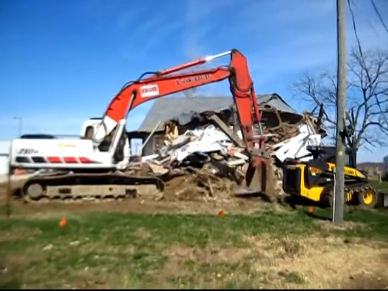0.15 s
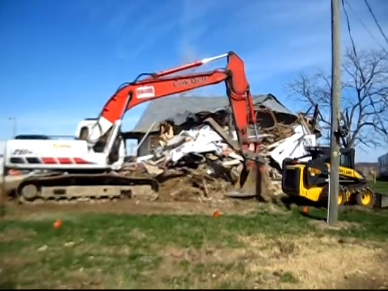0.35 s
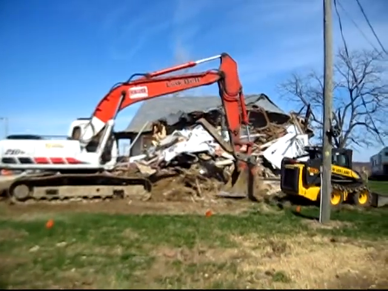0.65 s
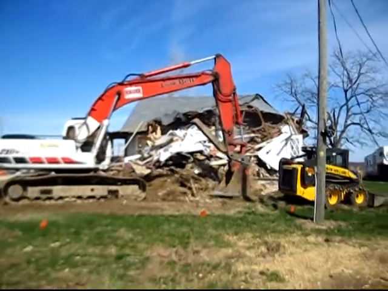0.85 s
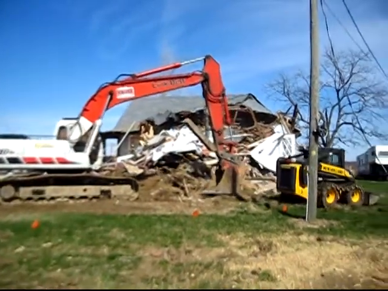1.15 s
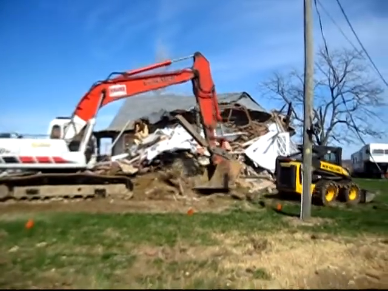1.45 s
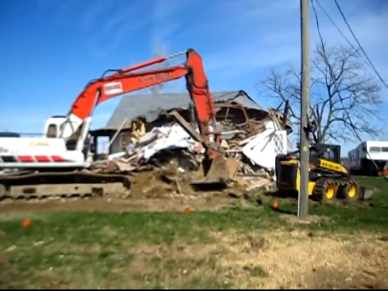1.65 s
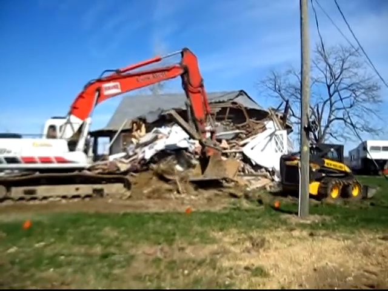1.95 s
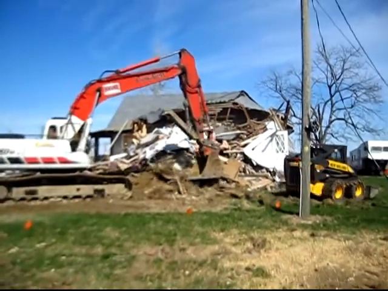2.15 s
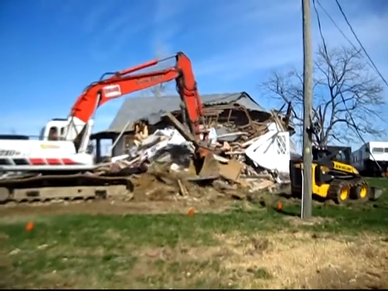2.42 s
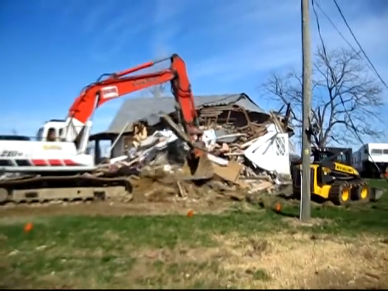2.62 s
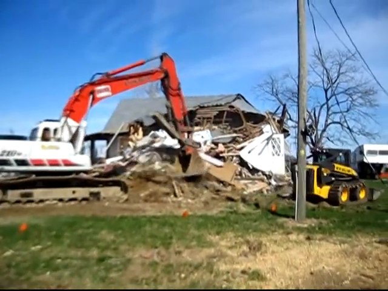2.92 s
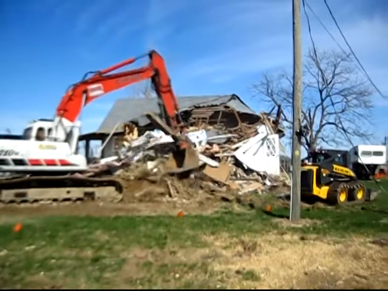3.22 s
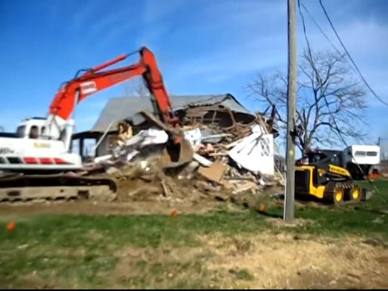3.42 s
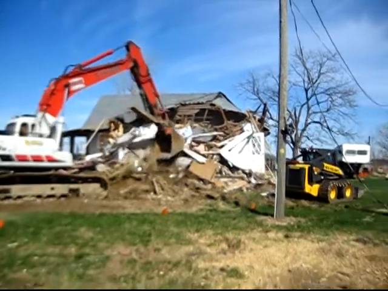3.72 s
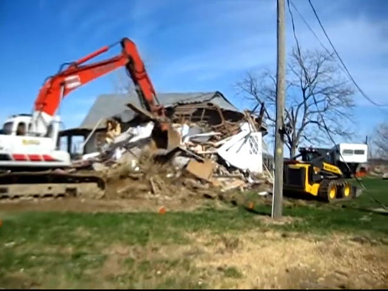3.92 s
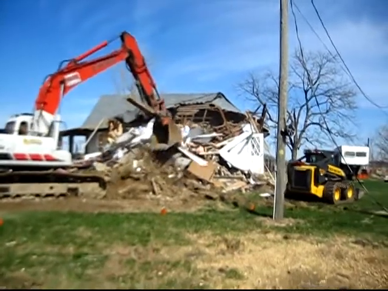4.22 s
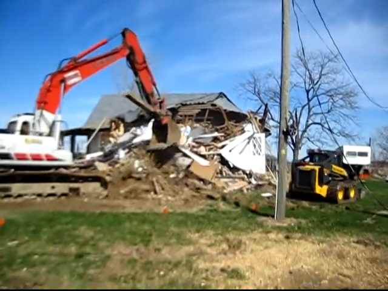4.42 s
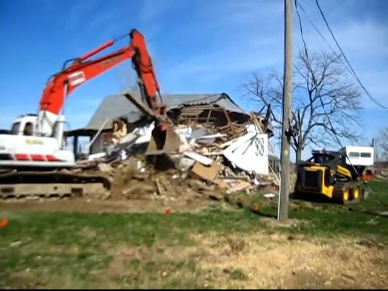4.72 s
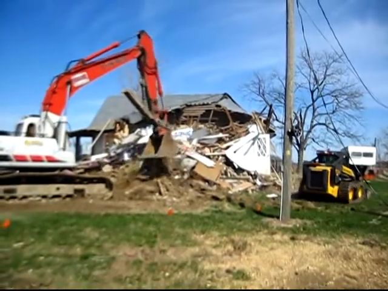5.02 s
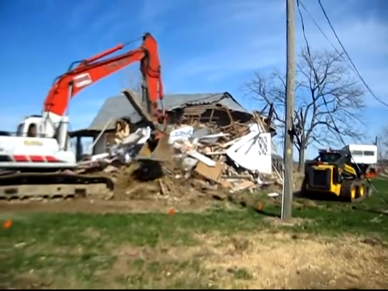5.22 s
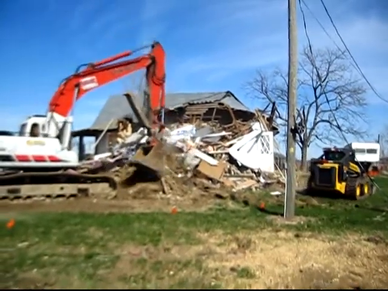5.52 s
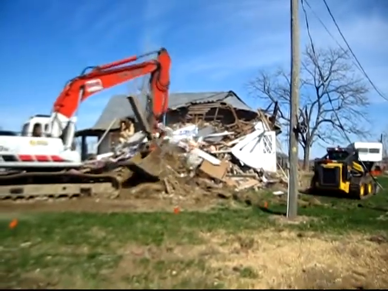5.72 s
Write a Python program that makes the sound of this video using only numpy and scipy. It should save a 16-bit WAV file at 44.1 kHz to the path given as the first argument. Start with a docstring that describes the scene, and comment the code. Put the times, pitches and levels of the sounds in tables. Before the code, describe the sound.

Low wind thuds and a rough engine drone open the scene. Hollow bucket knocks and tearing wood follow, then a dense run of cracks and debris slides until about 3.6 seconds. Afterwards mostly engine, trickling rubble and renewed wind bumps, with sparse snaps. Outdoors, machine at a distance, cheap microphone with harsh, limited treble.

```python
"""Excavator in a wooden wreck

A diesel excavator drags its bucket through a wrecked wooden house, heard across a lawn on a gusty day.
The engine drones: uneven knocks and a fan roar, coloured by its casing. Wind presses on the small microphone.
Random clicks make pouring rubble, bursts of fibre snaps make cracking boards, and sharp cycles make clean breaks.
Timbers ring the bucket, and steel joints squeak as near sines.
The microphone's slow converter mirrors the treble."""
import sys
import numpy as np
from scipy import signal
from scipy.fft import rfft, irfft, next_fast_len
from scipy.io import wavfile

SR = 44100
rng = np.random.default_rng(int(sys.argv[2]) if len(sys.argv) > 2 else 0)


def transcribe(signal):
    """Save signal, clipped to [-1, 1], as a 16-bit WAV file at the path in sys.argv[1]."""
    frames = np.atleast_2d(signal).T
    limited = np.clip(frames, -1, 1)
    pcm = np.round(limited * 32767).astype(np.int16)
    wavfile.write(sys.argv[1], SR, pcm)


N = 258867   # length of the sound in samples


def from_db(db):
    """Turns decibels into gain."""
    return 10 ** (np.asarray(db) / 20)


def rms_one(x):
    """Scales a signal to an rms (average strength) of 1."""
    return x / np.sqrt(np.mean(x ** 2) + 1e-20)


def in_time(rows):
    """Joins the points of a table into one curve per column, over all samples."""
    times, *columns = np.transpose(rows)
    return [np.interp(np.arange(N) / SR, times, column) for column in columns]


def filtered(x, response):
    """Applies a table of (frequency [Hz], gain [dB]) to a signal."""
    hz, db = np.transpose(response)
    size = next_fast_len(N + 4096)
    bins_hz = np.maximum(np.arange(size // 2 + 1) * SR / size, 1)
    gain = from_db(np.interp(np.log(bins_hz), np.log(hz), db))
    return irfft(rfft(x, size) * gain, size)[..., :N]


def coloured(x, spectrum):
    """Shapes a flat signal by a spectrum and scales it to rms 1."""
    return rms_one(filtered(x, spectrum))


def lowpass(x, hz, order):
    """Dulls a signal by weakening what lies above a frequency."""
    return signal.sosfilt(signal.butter(order, hz, fs=SR, output="sos"), x)


def drift(rate_hz):
    """Wanders at random around 0 with a spread of 1; a higher rate wanders faster."""
    step = 40   # samples between the computed points
    r = np.exp(-2 * step * np.pi * rate_hz / SR)
    noise = rng.standard_normal(N // step + 2002)
    slow = signal.lfilter([1], [1, -2 * r, r * r], noise)[2000:]   # skip the start-up of the filter
    return np.interp(np.arange(N) / step, np.arange(len(slow)), rms_one(slow))


def grains(per_s, spread_db):
    """Scatters random clicks of uneven size, all positive."""
    sizes = from_db(spread_db * np.minimum(rng.exponential(1, N), 4))
    return sizes * (rng.random(N) < per_s / SR)


def resonance(x, hz, width_hz):
    """Rings at one frequency, with gain 1 at the peak; a narrow width rings longer."""
    r = np.exp(-np.pi * width_hz / SR)
    top = np.array([1, 0, -1]) * (1 - r * r) / 2
    return signal.lfilter(top, [1, -2 * r * np.cos(2 * np.pi * hz / SR), r * r], x)


def wind():
    """Eddies press on the membrane mostly one way: skewed pulses in clumps over smooth turbulence."""
    # Gusts: (time [s], level [dB], small eddies against large [dB])
    gusts = [(0.0, -37, -5), (0.01, -23, 3), (0.21, -16.5, -2.5), (0.24, -28.5, -4), (0.33, -13, -2),
             (0.55, -18.5, -3.5), (0.57, -23, -2), (0.62, -22.5, 0.5), (0.69, -22, -1), (0.72, -24, 2),
             (0.82, -15, -3), (0.87, -18.5, -11), (1.14, -20, -1), (1.18, -9.5, -6), (1.19, -20.5, -14),
             (1.24, -15, 11.5), (1.26, -19, -7), (1.37, -19, -9), (1.45, -21.5, -8), (1.5, -18, -4.5),
             (1.57, -28, -23), (1.65, -15, -10), (1.68, -26, -15), (1.81, -27, -15), (1.86, -21.5, -6),
             (1.96, -23.5, -2), (2.09, -25, 4.5), (2.12, -14.5, -1.5), (2.2, -20, -1), (2.29, -22.5, 0.5),
             (2.4, -32.5, 7.5), (2.53, -22.5, -5), (2.66, -24.5, -2), (2.71, -19.5, 0.5), (2.76, -35.5, 2),
             (2.83, -40, 4), (2.88, -22.5, -6), (2.94, -28.5, -3), (3.06, -27.5, -3), (3.07, -32, -6),
             (3.32, -44.5, -1), (3.56, -28.5, 6.5), (3.6, -30.5, -2), (3.84, -30.5, 4), (3.92, -17.5, -1),
             (3.96, -29, 7.5), (4.32, -19, 4), (4.36, -24.5, -3), (4.4, -20.5, 1), (4.63, -20.5, -7.5),
             (4.67, -36, 9), (4.71, -21, 2), (4.76, -37, 6), (4.79, -21.5, -7), (4.97, -26.5, 9),
             (5.0, -24, 1), (5.02, -25, 5), (5.2, -20.5, 1.5), (5.21, -21.5, 2), (5.28, -19, -1),
             (5.71, -23, -12), (5.82, -23.5, 1.5), (5.87, -22, 4)]
    # Strong lone eddies: (time [s], peak [dB], half-width, at least 0.3 is used [ms])
    buffets = [(0.02, -17, 1.5), (0.0954, -11.5, 1.05), (0.1077, -13, 0.9), (0.1374, -6.5, 0.68),
               (0.153, -5, 0.77), (0.213, -7.5, 2.3), (0.275, -14, 3.4), (.3304, -15, 0.99),
               (0.338, -1.5, 1.06), (0.3573, -11.5, 0.74), (0.3742, -12, 0.5), (0.3938, -9, 0.78),
               (0.4334, -8, .7), (0.4556, -8, 0.94), (0.471, -6, 0.63), (0.5017, -6.5, 0.42),
               (0.5206, -10, 0.43), (0.55, -8, 1.4), (0.6561, -8, .9), (0.689, -2.5, 0.76),
               (0.7727, -11, 1.2), (.8075, -11.5, 2.7), (0.829, -18, 1.3), (1.0093, -11, 1.14),
               (1.022, -7, 1.7), (1.049, -7, 1.75), (1.0865, -5.5, 1.34), (1.1226, -4, 1.2),
               (1.1275, -7, 0.73), (1.1379, -6, 1.14), (1.1498, -8, 0.81), (1.1732, -9, 1),
               (1.234, -12, 0.29), (1.335, -8, 1), (1.355, -9.5, 1.15), (1.3682, -12, 1.5),
               (1.381, -8, 1.5), (1.402, -5.5, 1.04), (1.4452, -7.5, 1.2), (1.486, -8, 0.81),
               (1.4986, -4, 1.05), (1.5165, -4.5, 0.99), (1.8588, -7.5, 1.2), (1.894, -7, 1.08),
               (1.9907, -4, 0.95), (2.1266, -12, 2.1), (2.1444, -8, 1.6), (2.168, -10, 0.41),
               (2.25, -17, 1.4), (2.266, -13.5, 0.45), (2.5017, -9.5, 1.35), (2.53, -15.5, 1.5),
               (2.704, -17, 1.3), (2.717, -11, 1), (2.864, -17, 1.2), (2.879, -7.5, 1.5), (2.882, -13, 1.8),
               (2.913, -16, 1.7), (2.973, -17, 1.2), (3.008, -14, 0.95), (3.044, -19, 1), (3.054, -22, 0.7),
               (3.911, -13, 0.69), (3.923, -11, 0.94), (3.934, -22, 1.8), (4.0069, -11.5, 0.66),
               (4.186, -10, 0.71), (4.2222, -18, 0.54), (4.24, -16, 0.71), (4.4714, -21, 1.6),
               (4.6244, -11, 0.74), (4.646, -12, 0.78), (4.706, -12.5, 1.2), (4.8232, -13, 1.5),
               (4.992, -15, 0.76), (5.0003, -7.5, 0.58), (5.0702, -8.5, 0.62), (5.187, -8, 0.84),
               (5.3204, -8, 0.74), (5.3616, -14, 0.91), (5.4418, -11, 1.2), (5.5829, -13.5, 1.55),
               (5.7331, -7.5, 0.85), (5.78, -9, 1), (5.7857, -5.5, 0.66), (5.8145, -5.5, 1.03),
               (5.8379, -4, 0.55)]
    # Spectrum of the moving air: (frequency [Hz], relative level per Hz [dB])
    wind_colour = [(12, -40.5), (20, -35), (87, 2), (240, 1.5), (584, -8), (700, -13), (1110, -21.5),
                   (1340, -26.5), (1850, -21), (2500, -33.5), (3250, -57), (5500, -120)]

    level_db, small_db = in_time(gusts)
    clumped_rate = 300 * from_db(2.6 * drift(14))   # eddies per second
    eddies = grains(clumped_rate, spread_db=0.5)
    eddies = eddies * np.where(rng.random(N) < 0.8, 1, -1)   # four in five push the same way
    turbulence = 0.5 * rng.standard_normal(N)
    flow = coloured(rms_one(eddies - eddies.mean()) + turbulence, wind_colour)
    rumble_band = signal.butter(2, [45, 110], "band", fs=SR, output="sos")
    rumble = signal.sosfilt(rumble_band, rng.standard_normal(N))
    dull = lowpass(flow, 330, order=1)
    crisp = flow - dull   # the small eddies rise and fall by their own column of the gusts table
    air = dull + from_db(small_db) * crisp + 0.26 * rms_one(rumble)
    out = from_db(level_db + 0.95 * drift(35)) * air

    reach = 400   # samples on either side of a buffet
    t = np.arange(-reach, reach) / SR
    for s, peak_db, width_ms in buffets:
        u = t / (max(width_ms, 0.3) / 1000)
        push = from_db(peak_db) * (1 - u * u) * np.exp(-u * u / 2)   # pressure bump, suction either side
        at = round(s * SR)
        out[at - reach:at + reach] += push
    return out


def engine():
    """Sends one uneven knock per firing and a fan roar through the engine casing."""
    # Loudness: (time [s], level [dB])
    loudness = [(0.0, -26.5), (1.04, -31.5), (1.65, -37), (2.09, -29), (2.62, -31), (3.16, -32.5),
                (3.38, -36), (4.07, -26.5), (4.46, -29), (5.02, -28.5), (5.54, -29.5), (5.87, -28)]
    # Spectrum of the engine: (frequency [Hz], relative level per Hz [dB])
    engine_colour = [(18, -52.5), (30, -27), (102, 14), (545, -12), (708, 0), (900, -7.5), (1070, -1),
                     (1280, -20.5), (1890, -10), (2020, -8.5), (2740, -21), (2990, -10), (5500, -13.5),
                     (7150, -53), (12100, -120)]
    # Resonances of the casing: (frequency [Hz], width [Hz], level [dB])
    casing = [(189.3, 30, -4.5), (560.4, 46, -7), (1114, 120, -12.5), (1450, 180, -15.5), (2520, 700, -19)]
    firing_hz, jitter = 97.25, 0.04   # mean rate; spread of the timing as a share of one firing
    knock_level = 0.22   # rms, against the roar at about 1

    firings = np.cumsum(firing_hz * (1 + 0.004 * drift(1.4))) / SR + jitter * drift(43)
    strength = from_db(2.0 * rng.standard_normal(N))
    firing_knocks = np.diff(np.floor(firings), prepend=0) * strength
    puff = 1 + 0.041 * np.cos(2 * np.pi * firings)   # each exhaust stroke lifts the roar slightly
    drive = knock_level * rms_one(firing_knocks) + puff * rng.standard_normal(N)
    body = coloured(drive, engine_colour)
    for hz, width_hz, db in casing:
        body = body + from_db(db) * rms_one(resonance(drive, hz, width_hz))
    return from_db(in_time(loudness)[0] + drift(5.3)) * rms_one(body)


def rubble():
    """Clumps dense clicks of falling pieces, heavy ones lower; slides swell over the trickle and stop short."""
    # Steady trickle: (time [s], level [dB])
    trickle = [(0, -41), (.3, -30), (.52, -49), (.62, -36), (1.0, -30), (1.4, -35), (1.78, -40.5),
               (1.9, -34.5), (2.45, -40.5), (2.78, -35), (2.8, -41), (2.85, -37.5), (3.0, -32.5),
               (3.16, -45), (3.19, -45), (3.4, -40.5), (3.44, -38), (3.6, -30.5), (3.63, -37),
               (3.67, -34.5), (3.8, -36.5), (4.15, -34), (4.45, -35), (4.75, -35.5), (5.1, -36),
               (5.21, -39.5), (5.35, -33), (5.7, -33.5), (5.87, -47)]
    # Loads off the bucket: (start [s], length [s], level [dB], splinters against beams [dB])
    slides = [(0.548, 0.032, -28, -18), (0.83, 0.064, -26, -25), (1.31, 0.12, -38, -7),
              (1.611, 0.078, -38, 4.5), (1.837, 0.032, -37, -8), (2.04, 0.26, -31, -0.5),
              (2.435, 0.19, -29.5, -4), (2.536, 0.206, -26.5, -8), (2.882, 0.19, -34, -9),
              (3.11, 0.048, -28.5, -0.5), (3.824, 0.075, -28.5, -6), (5.661, 0.073, -29.5, -24)]
    # Spectra of light and heavy pieces: (frequency [Hz], relative level per Hz [dB])
    splinter_colour = [(1200, -17), (2200, -7.5), (3200, -8.5), (4300, -5), (5500, -10), (6500, -35)]
    beam_colour = [(250, -36), (500, -1.5), (900, -1.5), (1400, -5), (2500, -7.5), (3600, -18),
                   (5200, -31.5), (6000, -61.5)]
    swell_share, stop_s = 0.64, 0.017   # share of a slide spent swelling; fade after its end

    t = np.arange(N) / SR
    beam_power = from_db(2 * in_time(trickle)[0])   # doubled dB give power
    # finer pieces come loose as the bucket lifts: from -8 dB, up 3 dB per second until 2.95 s
    finer_db = -8 + 3.0 * np.minimum(t, 2.95)
    splinter_power = beam_power * from_db(2 * finer_db)
    for s, length, level_db, splinter_db in slides:
        corners = [s, s + swell_share * length, s + length, s + length + stop_s]
        swell = np.interp(t, corners, [0, 1, 1, 0])
        power = from_db(2 * level_db) * swell ** 2
        beam_power = beam_power + power
        splinter_power = splinter_power + power * from_db(2 * splinter_db)

    signs = rng.choice([-1, 1], (2, N))
    fine_clicks = grains(5000 * from_db(2.8 * drift(28)), spread_db=2.0)
    fine = coloured(signs[0] * fine_clicks, splinter_colour)
    heavy_clicks = grains(2200 * from_db(2.1 * drift(22)), spread_db=3.0)
    heavy = coloured(signs[1] * heavy_clicks, beam_colour)
    pieces = np.sqrt(beam_power) * heavy + np.sqrt(splinter_power) * fine
    return from_db(0.97 * drift(22)) * pieces


def squeaks():
    """Stick-slip locked to one steel mode: a near sine, some with an octave, fading as the joint frees."""
    # Squeaks: (start [s], length [s], first pitch [Hz], last pitch [Hz], top level [dB],
    # share spent swelling, level change after the top [dB], octave against the sine [dB])
    joints = [(.935, .175, 1073, 1073, -29, .1, -1, -25), (1.797, .09, 3625, 3815, -32, .33, -11, -30),
              (1.893, .074, 3820, 3830, -28.5, .3, -7, -30),
              (2.345, .06, 2480, 2492, -20.5, .55, -2.5, -12.5),
              (4.566, .014, 3440, 3440, -28, .2, -2, -30), (5.702, .032, 3705, 3722, -26, .7, -1, -30)]

    out = np.zeros(N)
    waver = from_db(0.6 * drift(40))
    wobble = 1 + 0.004 * drift(25)   # small wandering of the pitch
    for s, length, first_hz, last_hz, level_db, top, change_db, octave_db in joints:
        part = np.linspace(0, 1, round(length * SR))
        at = round(s * SR)
        here = slice(at, at + len(part))
        pitch_hz = (first_hz + (last_hz - first_hz) * part) * wobble[here]
        phase = 2 * np.pi * np.cumsum(pitch_hz) / SR
        swell = np.interp(part, [0, top, 0.85, 1], [0, 1, from_db(change_db), 0])
        octave_in = np.clip(20 * part - 12.2, 0, 1)   # enters well past the middle
        octave = from_db(octave_db) * octave_in * np.sin(2 * phase)
        octave = octave * (last_hz < 2700)   # higher octaves lie beyond the converter
        out[here] += from_db(level_db) * swell * (np.sin(phase) + octave)
    return out * waver


def knocks():
    """Timbers set the bucket's modes ringing, each mode with a strength of its own at each blow."""
    # Blows: (time [s], level [dB])
    timbers = [(0.6171, -19), (0.7508, -30), (0.763, -17.5), (.806, -29), (.8775, -22), (0.893, -22),
               (.91, -22), (1.245, -28), (4.691, -25)]
    # Modes of the bucket: (frequency [Hz], level [dB], time to fall by 60 dB [s])
    bucket = [(700, -4, .04), (865, -3, .05), (1010, 1, .06), (1240, -7, .04), (1900, -6, .04),
              (2450, -5, .04), (3050, -10, .03)]

    out = np.zeros(N)
    s, db = np.transpose(timbers)
    luck = rng.standard_normal((len(s), len(bucket)))
    for (hz, mode_db, t60), own in zip(bucket, luck.T):
        blows = np.full(N, 1e-18)   # a tiny floor instead of exact silence
        blows[np.round(s * SR).astype(int)] = from_db(db + mode_db + 2.5 * own)
        width_hz = 2.2 / t60
        out += resonance(blows, hz, width_hz) * SR / (2 * np.pi * width_hz)
    return lowpass(out, 3200, order=2)   # wood on steel is a soft contact


def snaps():
    """Makes each clean break a single sharp cycle: a click through two strongly damped resonances."""
    # Clean breaks: (time [s], peak [dB], pitch [Hz])
    breaks = [(.561, -18, 1600), (.8072, -18, 1300), (1.6892, -18, 3000), (2.1882, -16, 2000),
              (2.2426, -17, 1500), (2.2672, -16, 1500), (2.588, -15, 2500), (2.7503, -16, 3500),
              (2.9156, -18, 3000), (3.0343, -13, 1600), (3.0583, -15, 3200), (3.1629, -17, 2000),
              (5.5451, -18, 2000), (.6168, -12, 1100), (.7511, -12, 1400), (.8768, -12, 1400),
              (1.2466, -12, 2200), (2.3799, -11, 2300), (2.6105, -12, 2400), (2.7768, -13, 3800),
              (3.267, -12, 3200), (3.612, -7.5, 2900)]
    damping = 0.99   # width of the ring against its pitch

    out = np.zeros(N)
    click = np.eye(1, 200)[0]
    for s, peak_db, hz in breaks:
        cycle = resonance(resonance(click, hz, damping * hz), hz, damping * hz)
        at = round(s * SR)
        out[at:at + len(cycle)] += from_db(peak_db) * cycle / np.abs(cycle).max()
    return out


def cracks():
    """While a board tears, fibres snap densely; they sound directly and set the board's modes ringing."""
    # Tearing boards: (time [s], level [dB], pitch centre [Hz], tearing time [ms])
    tears = [(0.567, -25, 3070, 5.1), (0.6153, -20.5, 880, 51), (0.7514, -18, 1700, 22),
             (0.836, -19.5, 2300, 9), (0.8776, -23, 1500, 28), (1.017, -21, 1580, 13),
             (1.111, -17.5, 2200, 4.9), (1.231, -18, 2230, 6), (1.243, -10.5, 1810, 5.1),
             (1.255, -25, 2250, 3.4), (1.308, -17, 2430, 6.9), (1.403, -24, 1510, 11),
             (1.489, -18, 2080, 5.2), (1.513, -13.5, 2780, 3.1), (1.539, -21, 2080, 3.7),
             (1.57, -18, 2110, 8), (1.626, -20, 2040, 8.9), (1.664, -17, 2320, 5.1),
             (1.677, -12.5, 2520, 2.9), (1.986, -17.5, 2390, 6.1), (2.184, -20.5, 1870, 5.5),
             (2.297, -12, 2020, 3.1), (2.461, -16.5, 1980, 1.8), (2.488, -18, 1370, 6.5),
             (2.582, -18.5, 1920, 32), (2.609, -16.5, 2390, 6.2), (2.638, -14, 2050, 7.5),
             (2.668, -20.5, 2140, 56), (2.69, -20, 1840, 7.1), (2.713, -17, 1960, 5), (2.73, -17, 2210, 16),
             (2.765, -15, 2700, 16), (2.834, -23.5, 3300, 7.1), (2.936, -18, 1910, 6.2),
             (3.005, -31, 1816, 3.1), (3.032, -16, 1600, 11), (3.058, -22, 3550, 5.2),
             (3.14, -32, 1980, 44), (3.178, -20, 3560, 5.5), (3.208, -28, 3600, 2.2), (3.249, -35, 3600, 2),
             (3.2676, -18.5, 2600, 4.6), (3.289, -24.5, 790, 17), (3.419, -20, 2380, 11.5),
             (3.6124, -16.5, 2530, 3.3), (4.505, -15, 2830, 5.2), (4.57, -22, 2750, 5),
             (4.615, -31, 2000, 3.7), (4.688, -25, 1310, 9.7), (5.122, -25.5, 1900, 11)]
    # Modes of a board: (multiple of the pitch centre, relative level [dB], time to fall by 60 dB [s])
    board = [(.45, -3, .03), (.62, -2, .025), (.8, -1, .022), (1.1, -3, .02), (1.4, -2, .018),
             (1.8, -4, .015)]

    t = np.arange(6000) / SR
    out = np.zeros(N + len(t))
    luck = rng.standard_normal((len(tears), len(board)))
    fibres = rng.standard_normal((len(tears), len(t)))
    fibres = fibres * np.abs(fibres)   # makes strong snaps stand out
    fibres[:, 16] = 7.3   # the break that opens each crack
    for (s, level_db, hz, tear_ms), own, fibre in zip(tears, luck, fibres):
        done = 1000 * t / tear_ms
        onset = np.minimum(t / 0.00046, 1)
        fade = from_db(-4.0 * done) / (1 + done ** 6)
        burst = rms_one(fibre) * onset * fade
        sound = 0.4 * resonance(burst, hz, 1.2 * hz) * np.sqrt(SR / (2 * hz))
        for (ratio, mode_db, t60), chance in zip(board, own):
            width_hz = 2.2 / t60
            ring = resonance(burst, min(hz * ratio, 5300), width_hz) * np.sqrt(SR / (2 * width_hz))
            sound += from_db(mode_db - 21 + 2 * chance) * ring
        sound = lowpass(sound, 1.56 * hz, order=2)   # thick boards are dull
        at = round(s * SR)
        out[at:at + len(t)] += from_db(level_db) * sound
    return out[:N]


def yard(x):
    """Adds a few dull echoes off the wreck and the machine."""
    # Echoes: (delay [s], level [dB])
    echoes = [(0.03, -17.5), (0.056, -15.5), (.094, -29)]

    dull = lowpass(x, 2500, order=1)
    return x + sum(from_db(db) * np.pad(dull, (round(s * SR), 0))[:N] for s, db in echoes)


def scene():
    """Adds the distant machine and wreck to the close wind; wood and bucket blows get echoes."""
    struck = yard(cracks() + snaps() + knocks())
    return (struck + squeaks() + rubble() + engine() + wind())[None]


def record(dry):
    """Rounds the peaks; a converter at a quarter of the rate mirrors the treble, smoothed only gently."""
    # Smoothing after the converter: (frequency [Hz], gain [dB])
    smoothing = [(20, -3.5), (3000, 0), (4000, -4.5), (5500, -8.5), (7000, -25), (8500, -40), (9500, -54.5),
                 (10500, -76.5), (12000, -110)]
    step = 4   # one sample in four is kept, so sound above SR / 8 is mirrored
    stop_hz = 10964.1   # from here up, 40 dB down
    offset = -0.0056   # constant shift of the whole signal

    rounded = 0.53 * np.tanh(dry / 0.5)
    taken = step * rounded * (np.arange(N) % step == 0)
    steep = signal.cheby2(8, 40, stop_hz, fs=SR, output="sos")
    return signal.sosfilt(steep, filtered(taken, smoothing)) + offset


dry = scene()
out = record(dry)
transcribe(out)
```